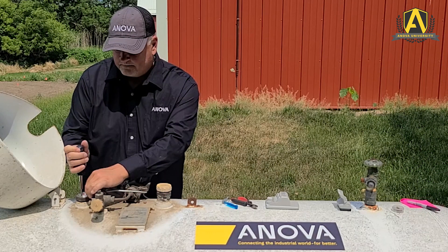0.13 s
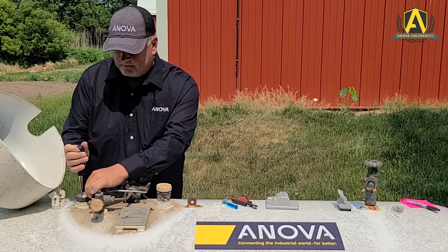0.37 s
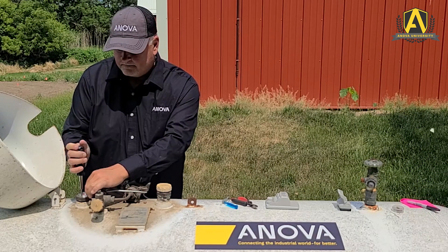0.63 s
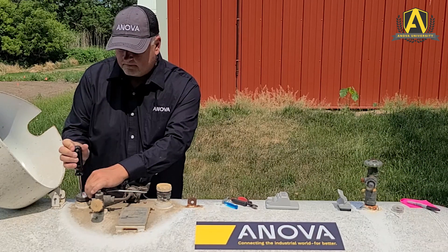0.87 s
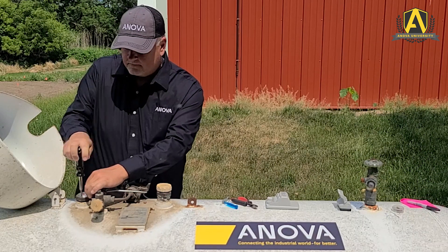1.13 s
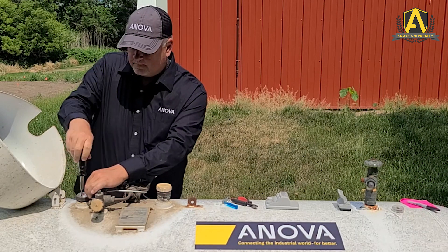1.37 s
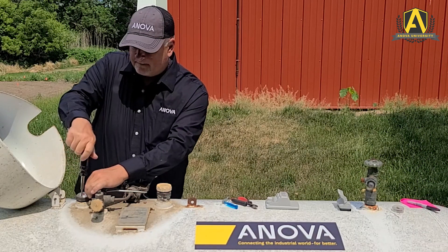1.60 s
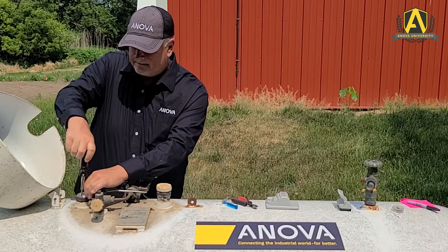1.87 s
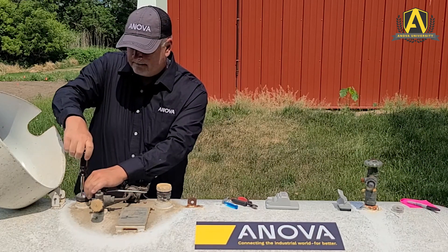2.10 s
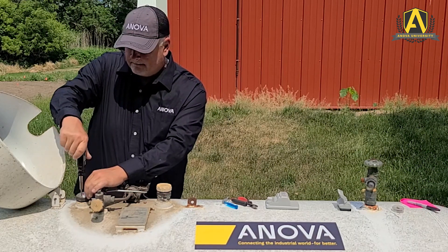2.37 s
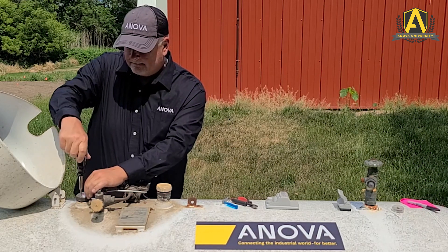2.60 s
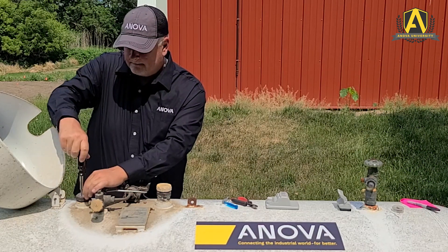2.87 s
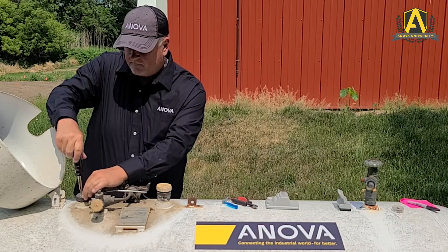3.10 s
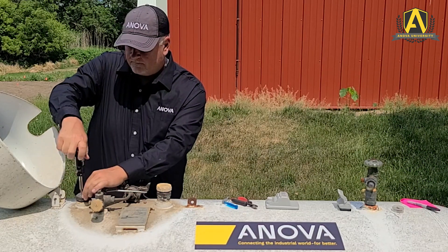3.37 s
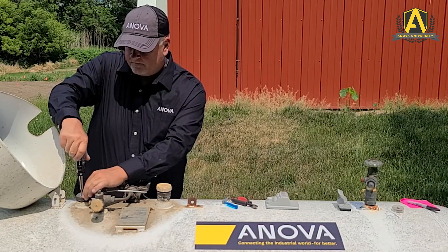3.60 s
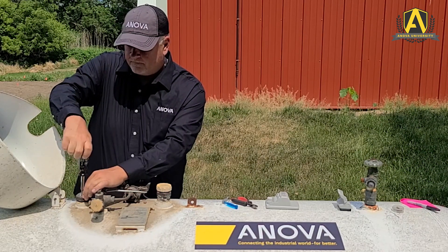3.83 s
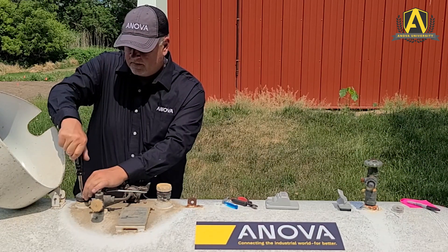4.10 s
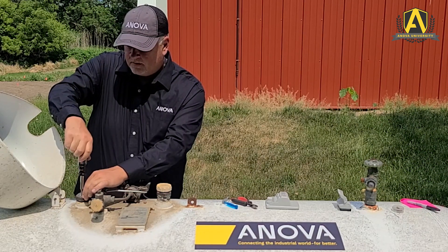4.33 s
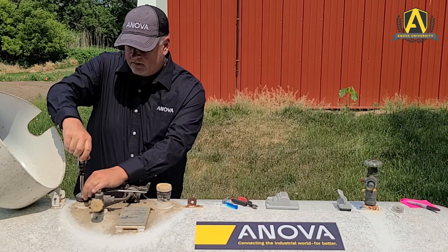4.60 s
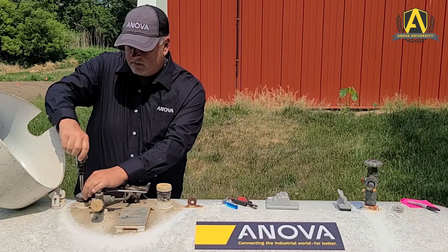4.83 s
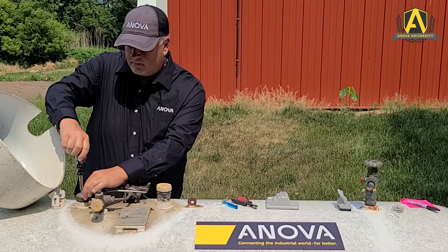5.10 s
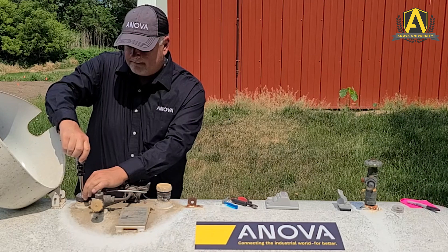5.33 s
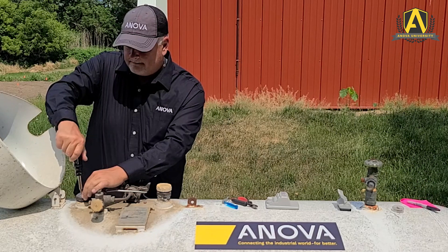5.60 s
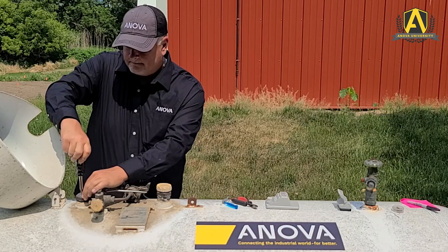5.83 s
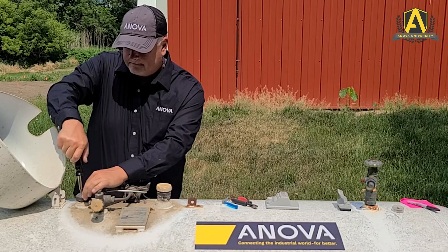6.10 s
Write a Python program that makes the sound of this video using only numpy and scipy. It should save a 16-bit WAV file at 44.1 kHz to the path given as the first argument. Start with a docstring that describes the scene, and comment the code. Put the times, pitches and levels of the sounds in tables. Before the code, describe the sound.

Sparse metallic knocks, small pings and a brief screw creak echo hollowly, ending with a strong clang above a distant low drone.

```python
"""A steel tool knocks and ticks against a fitting on a large hollow metal body in a reverberant space.
A light knock and a ping of the shaft open the scene over a motor hum, a rustle and a faint hiss.
More knocks follow, each a short pulse, a stronger return a few ms later and a dense ring that dies from
the top down; at 1.8 s a screw creaks once in a fading run of jerks. From 3 s a far drone wanders in pitch,
and the strongest knock lands at 5.3 s with a metallic clang. A noise suppressor cuts the tails."""
import sys
import numpy as np
from scipy import signal
from scipy.fft import rfft, irfft
from scipy.io import wavfile
from scipy.ndimage import uniform_filter1d

SR = 44100
rng = np.random.default_rng(int(sys.argv[2]) if len(sys.argv) > 2 else 0)


def to_linear_factor(level_db):
    """Convert decibel levels (scalar or array-like) to linear amplitude factors."""
    exponent = np.asarray(level_db, float) / 20
    return 10 ** exponent


def wav_out(sig):
    """Save sig, one row per channel (or a flat mono array), as 16-bit PCM at SR to the path in sys.argv[1]."""
    wavfile.write(sys.argv[1], SR, np.round(np.clip(np.atleast_2d(sig).T, -1, 1) * 32767).astype(np.int16))


N = 273728


def rms_one(x):
    """Scale to rms 1."""
    return x / np.sqrt(np.mean(x ** 2) + 1e-20)


def sample_of(s):
    """Times in seconds as sample numbers."""
    return np.maximum(np.round(np.asarray(s) * SR).astype(int), 0)


def in_time(rows):
    """Draw each column of a timed table as a curve, one value a sample."""
    s, *columns = np.transpose(rows)
    return [np.interp(np.arange(N) / SR, s, c) for c in columns]


def at_hz(points, hz):
    """Read a spectrum on a log-frequency axis."""
    points = np.array(sorted(points))
    return np.interp(np.log(hz), np.log(points[:, 0]), points[:, 1])


def coloured(spectrum):
    """Steady noise of a given spectrum, silent outside its end points, rms 1."""
    hz = np.maximum(np.fft.rfftfreq(N, 1 / SR), 1)
    inside = (hz > spectrum[0][0]) & (hz < spectrum[-1][0])
    white = rfft(rng.standard_normal(N))
    return rms_one(irfft(white * to_linear_factor(at_hz(spectrum, hz)) * inside, N))


def slow_chance():
    """Random wandering slower than about 5 Hz, rms 1."""
    low_pass = signal.butter(2, 5.3, fs=SR, output="sos")
    wander = signal.sosfilt(low_pass, rng.standard_normal(N + SR))
    return rms_one(wander[SR:])  # the filter has settled after one second


def ring(clicks, hz, t60):
    """A two-pole resonator: a unit click sets off a decaying sine of height about 1."""
    r, w = to_linear_factor(-60 / (t60 * SR)), 2 * np.pi * hz / SR
    return signal.lfilter([0, np.sin(w)], [1, -2 * r * np.cos(w), r * r], clicks + 1e-18)


def struck(modes, s, db, spread_db):
    """Blows strike every mode, each with a chance strength; db has a row a blow, a column a mode (or one)."""
    at, out = sample_of(s), np.zeros(N)
    chance = rng.standard_normal((len(at), len(modes)))
    db = np.broadcast_to(db, chance.shape)
    for k, (hz, mode_db, t60) in enumerate(modes):
        clicks = np.zeros(N)
        clicks[at] = to_linear_factor(db[:, k] + mode_db + spread_db * chance[:, k])
        out += ring(clicks, hz, t60)
    return out


def causal_pulse(points, size=1024):
    """The minimum-phase pulse of a given spectrum; nothing sounds before the contact."""
    hz = np.maximum(np.fft.rfftfreq(size, 1 / SR), 1)
    cepstrum = irfft(np.log(to_linear_factor(at_hz(points, hz))), size)
    # fold the cepstrum onto positive time
    cepstrum[1:size // 2] *= 2
    cepstrum[size // 2 + 1:] = 0
    return irfft(np.exp(rfft(cepstrum)), size)


def knocks():
    """Each blow is a short broad pulse plus the fitting's modes, tilted by how heavily and hard it lands."""
    # Tool on fitting. Each row: start in seconds, blow strength in dB, thud in dB per octave below the
    # middle of the blow, hardness in dB per octave above it, crack in dB per octave at the top.
    blow_rows = [(0.0014, -59, -7.5, 10, 1), (0.1958, -56, 9.5, 1, -1.5), (0.9984, -33, -3.5, -5.5, -0.5),
                 (1.0991, -57, 4.5, 3.5, -0.5), (1.2307, -47.5, -12, -10.5, 8), (1.5304, -55, -9.5, 3, -6),
                 (2.2496, -23, -7.5, -0.5, -1.5), (2.7681, -38, -1.5, 2.5, -3.5),
                 (3.1081, -49.5, -19.5, 1, -5), (3.8108, -53.5, 6, 4.5, 2), (4.0045, -56, 9.5, 4.5, 2.5),
                 (4.8316, -38, 4.5, -3, -0.5), (4.9169, -30.5, -2.5, -0.5, -1),
                 (5.3206, -20, -11.5, 0, 8.5)]
    # Modes of the fitting. Each row: frequency in Hz, relative level in dB, t60 in seconds.
    fitting_modes = [(258, -4, .2), (422.4, -1.5, 0.45), (537, -3, .2), (723.2, 1.5, .2),
                     (890, -21.5, 0.033), (980, 0, 0.073), (1046, -3.5, 0.052), (1201, -2, 0.067),
                     (1263, -1.5, 0.24), (1353.6, 0.5, 0.13), (1408, -3, 0.039), (1547, -4.5, 0.091),
                     (1660, -1, 0.18), (2077, -4.5, 0.093), (2188, 5.5, 0.074), (2460, -13, 0.093),
                     (2890, 11, 0.067), (3750, -9.5, 0.062), (4900, -22.5, .04), (6400, -7.5, .04),
                     (7500, -0.5, .03)]
    # Colour of an average blow. Each row: frequency in Hz, relative level in dB.
    blow_colour = [(200, -31), (500, -2.5), (800, 0.5), (1200, 1), (1750, -1.5), (2300, -1), (2800, -11.5),
                   (3400, -13), (6000, -22), (10000, -49), (15000, -61)]
    middle_hz, crack_from_hz = 1200, 3400
    pulse_db, modes_db = 29.5, -18  # added to the blow strength

    blow_hz, blow_db = np.transpose(blow_colour)
    octaves = np.log2(blow_hz / middle_hz)
    below, above = np.maximum(-octaves, 0), np.maximum(octaves, 0)
    top = np.maximum(np.log2(blow_hz / crack_from_hz), 0)
    colours = []
    for _, db, thud, hard, crack in blow_rows:
        tilt_db = thud * below + hard * above + crack * top
        colours.append(list(zip(blow_hz, db + blow_db + tilt_db)))

    s, mode_hz = np.array(blow_rows)[:, 0], np.array(fitting_modes)[:, 0]
    mode_levels = np.array([at_hz(colour, mode_hz) for colour in colours])
    out = struck(fitting_modes, s, mode_levels + modes_db, spread_db=2.0)
    for at, colour in zip(sample_of(s), colours):
        pulse = causal_pulse(colour)
        out[at:at + len(pulse)] -= to_linear_factor(pulse_db) * pulse
    return out


def clangs():
    """A few blows also catch the metal ring, which sounds a tight cluster of modes."""
    # Each row: start in seconds, strike level in dB.
    clang_rows = [(1.5304, -67), (2.25, -44.5), (5.321, -28)]
    # Each row: frequency in Hz, relative level in dB, t60 in seconds.
    metal_ring = [(3240, -11.5, 0.058), (3443, -7.5, 0.049), (3300, -16, 0.029), (3690, -23.5, 0.088)]
    s, strike_db = np.transpose(clang_rows)
    return struck(metal_ring, s, strike_db[:, None], spread_db=1.0)


def body_response():
    """The hollow body: direct sound, one strong return, then dense modes that fill in and die band by band."""
    # Strength of the dense modes. Each row: frequency in Hz, relative level in dB.
    body_strength = [(150, -10), (260, 5.5), (350, 2.5), (500, 4), (650, -1.5), (900, 2), (1250, 3),
                     (1650, 0), (2200, -1.5), (2500, 0), (2800, -4.5), (3400, 1), (4200, -3.5), (6000, -5),
                     (10000, 4), (15000, -12)]
    # How long they ring. Each row: frequency in Hz, t60 in seconds.
    body_t60 = [(200, 2.8), (500, 1.53), (900, 2.45), (1400, 1.594), (2200, 1.56), (3600, .95),
                (6000, 0.93), (10000, 0.51), (14000, .3)]
    direct_db, return_s, return_over_direct_db = -2.5, 0.0042, 1
    early_over_late_db, early_t60_s, late_db = 2.5, 0.12, -25.5
    rise_s = 0.002

    t = np.arange(int(1.8 * SR)) / SR
    edges = 140 * 2 ** (np.arange(28) / 4)  # quarter-octave bands from 140 Hz
    dense, out = rng.standard_normal((2, len(t))), np.zeros(len(t))
    early = to_linear_factor(early_over_late_db - 60 * t / early_t60_s)
    for k, (low, high) in enumerate(zip(edges, edges[1:])):
        hz = np.sqrt(low * high)
        band_pass = signal.butter(2, [low, high], "band", fs=SR, output="sos")
        band = signal.sosfilt(band_pass, dense[k % 2])  # neighbouring bands use separate noise
        late = to_linear_factor(-60 * t / at_hz(body_t60, hz))
        out += to_linear_factor(late_db + at_hz(body_strength, hz)) * band * (early + late)
    out *= 1 - np.exp(-(t / rise_s) ** 2)  # sound spreads for a few ms before the ring is full
    out[0] = to_linear_factor(direct_db)
    out[round(return_s * SR)] = -to_linear_factor(direct_db + return_over_direct_db)
    return out


def pings():
    """The shaft of the tool pings on an edge: only its own close modes ring."""
    # Each row: start in seconds, strike level in dB.
    ping_rows = [(0.0014, -37), (0.2059, -51.5), (1.3478, -47.5), (2.7686, -28), (3.3662, -47.5),
                 (3.5255, -39.5), (3.8494, -81), (3.9584, -42)]
    # Each row: frequency in Hz, relative level in dB, t60 in seconds.
    shaft_modes = [(2080, -7, 0.065), (2200, -11.5, 0.035), (2170, -15.5, 0.053), (2246, -29.5, 0.032)]
    s, strike_db = np.transpose(ping_rows)
    return struck(shaft_modes, s, strike_db[:, None], spread_db=1.5)


def ticks():
    """Light touches of the blade in the slot ring only the blade, with faint returns from nearby surfaces."""
    # Each row: start in seconds, strike level in dB.
    tick_rows = [(0.1976, -40), (2.7699, -42.5), (3.523, -56), (3.8076, -51.5), (3.9966, -50.5),
                 (4.2334, -51), (4.433, -55.5)]
    # Each row: frequency in Hz, relative level in dB, t60 in seconds.
    blade_modes = [(2800, 1.5, 0.014), (3580, -11.5, 0.022), (6000, -11.5, 0.016), (8200, -9.5, 0.0089),
                   (9000, -14.5, 0.014)]
    s, strike_db = np.transpose(tick_rows)
    blade = struck(blade_modes, s, strike_db[:, None], spread_db=1.0)
    t = np.arange(SR // 5) / SR
    # a decaying noise tail after a 6 ms gap, t60 0.18 s
    returns = rng.standard_normal(len(t)) * to_linear_factor(-32.5 - 60 * t / 0.18) * (t > 0.006)
    return blade + signal.fftconvolve(blade, returns)[:N]


def creak(count=8):
    """A screw creaks in its thread: a fading run of nearly even stick-slip jerks rings two close resonances."""
    # What the jerks ring. Each row: frequency in Hz, relative level in dB, t60 in seconds.
    thread_modes = [(690, -8.5, 0.05), (694, 0, 0.031)]
    start_s, gap_s = 1.794, 0.028
    first_db, loss_db_per_jerk = -43.5, 1
    k = np.arange(count)
    s = start_s + gap_s * (k + 0.05 * rng.standard_normal(count))
    jerk_db = first_db - loss_db_per_jerk * k
    return struck(thread_modes, s, jerk_db[:, None], spread_db=1.5)


def motor_hum():
    """A motor idling far off: sines at multiples of a wavering 43.9 Hz, each wavering in level."""
    # Each row: multiple of the base pitch, middle level in dB rms.
    hum_partials = [(1, -62.5), (2, -59.5), (3, -56), (4, -62.5), (5, -69.5), (6, -86), (7.5, -63.5)]
    turns = np.cumsum(43.9 + 0.375 * slow_chance()) / SR
    out = np.zeros(N)
    for multiple, db in hum_partials:
        level = to_linear_factor(db + 1.55 * slow_chance()) * np.sqrt(2)
        out += level * np.sin(2 * np.pi * multiple * turns)
    return out


def far_drone():
    """Two sines follow one wandering pitch, like an engine speeding up and slowing."""
    # Each row: time in seconds, middle pitch in Hz, level in dB before the level of each order.
    drone_course = [(2.95, 90.3, -61.5), (3.3, 83.5, -62), (3.6, 83, -54.5), (3.78, 99.1, -65),
                    (4.1, 100, -59), (4.28, 90, -73), (4.47, 81.4, -52.5), (4.65, 62.93, -93),
                    (5.0, 69.4, -64), (5.2, 84.2, -64), (5.56, 86.5, -56), (5.68, 61.7, -61.5),
                    (5.95, 63, -66), (6.21, 65, -59)]
    # Each row: multiple of the pitch, level in dB added to the course.
    order_levels = [(1, 10), (1.5, 1.5)]
    hz, level_db = in_time(drone_course)
    fade_in = np.clip((np.arange(N) / SR - drone_course[0][0]) * 10, 0, 1)  # over 0.1 s
    cycles = np.cumsum(hz + 1.48 * slow_chance()) / SR
    out = np.zeros(N)
    for multiple, db in order_levels:
        out += to_linear_factor(level_db + db) * np.sqrt(2) * np.sin(2 * np.pi * multiple * cycles)
    return fade_in * out


def rustle():
    """Low-weighted noise whose level rises and falls slowly."""
    # Each row: time in seconds, level in dB rms.
    rustle_course = [(0, -56.5), (.8, -60.5), (1.7, -56.5), (2.2, -61.5), (3.3, -54), (4.2, -53),
                     (4.8, -61), (6.21, -53)]
    # Each row: frequency in Hz, relative density in dB per Hz.
    rustle_colour = [(250, -1.5), (500, 1), (900, 5), (1500, -4.5), (2500, -16), (4500, -29.5)]
    level_db, = in_time(rustle_course)
    return to_linear_factor(level_db) * coloured(rustle_colour)


def hiss():
    """Steady broadband noise, weaker towards the treble, at -51 dB rms."""
    # Each row: frequency in Hz, relative density in dB.
    hiss_colour = [(36, 1), (60, -1), (110, 6), (200, -4.5), (400, -7.5), (800, -11), (1600, -20),
                   (2600, -22), (4000, -27), (6600, -29.5), (7600, -35), (10000, -32.5), (12000, -37.5),
                   (14000, -32.5), (17000, -36.5)]
    return to_linear_factor(-51) * coloured(hiss_colour)


def scene():
    """Knocks and clangs ring the hollow body fully, pings and creak lightly; all meet at one microphone."""
    light = pings() + creak()
    into_body = knocks() + clangs() + to_linear_factor(-8) * light
    through_body = signal.fftconvolve(into_body, body_response())[:N]
    background = motor_hum() + far_drone() + rustle() + hiss()
    return (through_body + light + ticks() + background)[None]


def suppress(x):
    """Turns each band down when it sinks near its usual quiet level, so tails end early; bass stays down."""
    # Band limits of the noise suppressor, one column: frequency in Hz.
    band_limits = [230, 400, 650, 900, 1300, 1750, 2200, 2680, 3050, 3900, 4700, 5600, 6800, 8200, 10000,
                   12000]
    half_open_db, knee_db, depth_db, average_s = 7.5, 3, 10.5, 0.039
    size, hop = 1024, 128
    hz, _, z = signal.stft(x, SR, nperseg=size, noverlap=size - hop)
    band = np.searchsorted(band_limits, hz)
    power = np.array([np.mean(np.abs(z[band == b]) ** 2, axis=0) for b in np.unique(band)])
    power = uniform_filter1d(power, max(1, round(average_s * SR / hop)), axis=1)
    level_db = 10 * np.log10(np.maximum(power, 1e-20))
    quiet_db = np.percentile(level_db, 25, axis=1)[:, None]
    over_db = level_db - quiet_db - half_open_db
    gain = to_linear_factor(-depth_db * (1 - np.tanh(over_db / knee_db / 2)) / 2)
    gain[0] = to_linear_factor(-depth_db)  # the bass band never opens
    return signal.istft(z * gain[band], SR, nperseg=size, noverlap=size - hop)[1][:N]


def roll_off(x):
    """The treble ends steeply here."""
    return signal.sosfilt(signal.butter(12, 15830, fs=SR, output="sos"), x)


def record(dry):
    """A 36 Hz low cut and the noise suppressor finish the mix."""
    low_cut = signal.butter(4, 36, "high", fs=SR, output="sos")
    mix = suppress(signal.sosfilt(low_cut, dry[0]))[None]
    return roll_off(mix)


dry = scene()
out = record(dry)
wav_out(out)
```